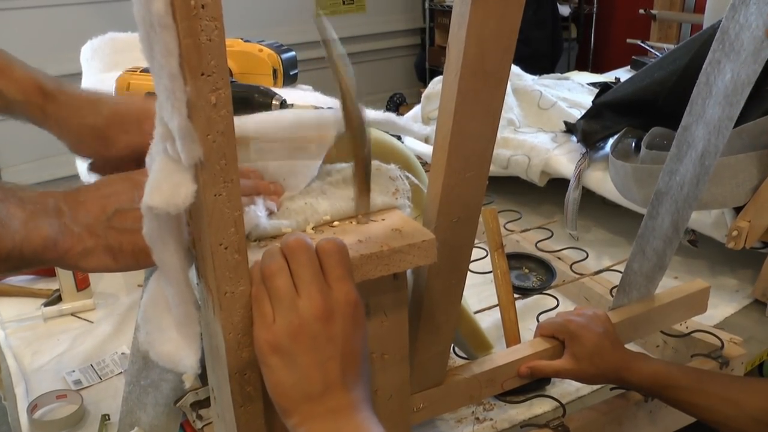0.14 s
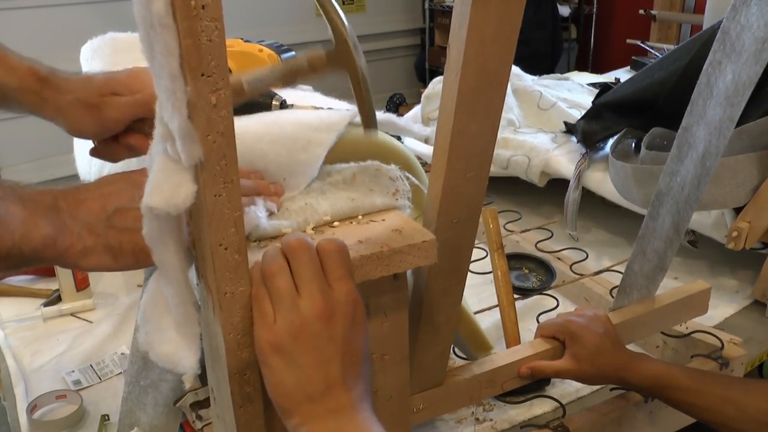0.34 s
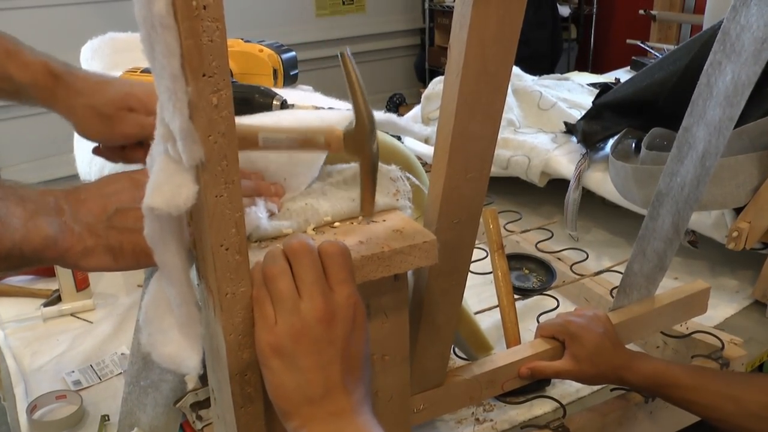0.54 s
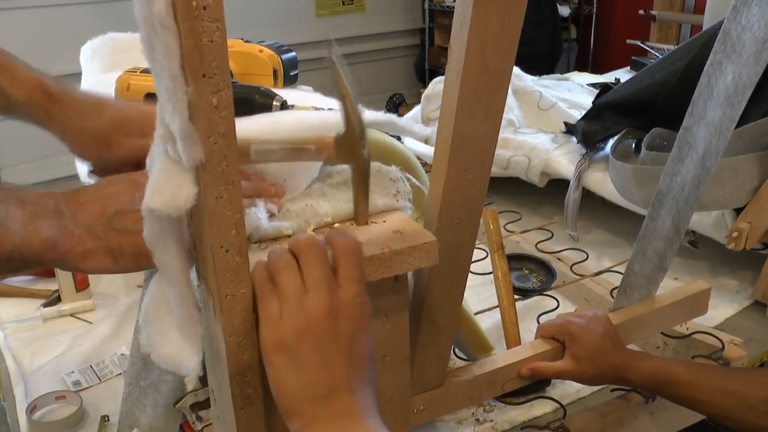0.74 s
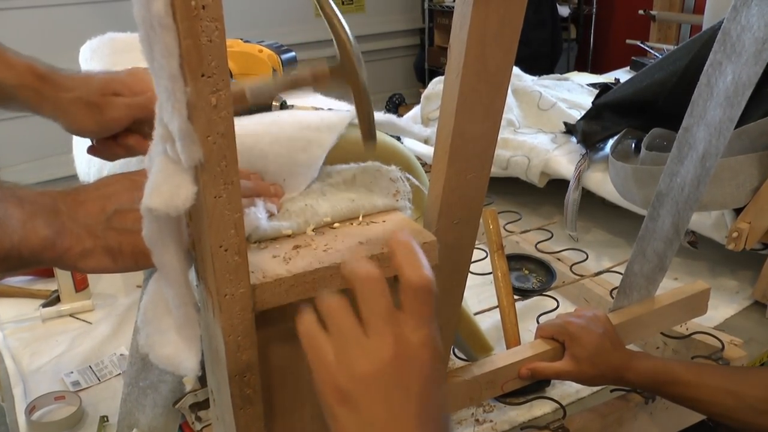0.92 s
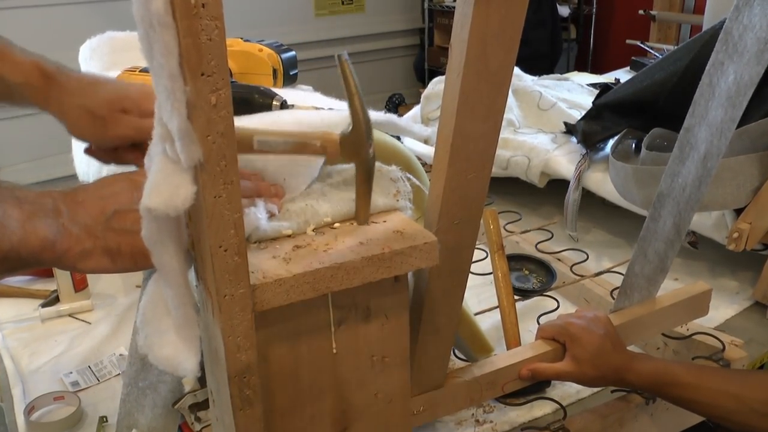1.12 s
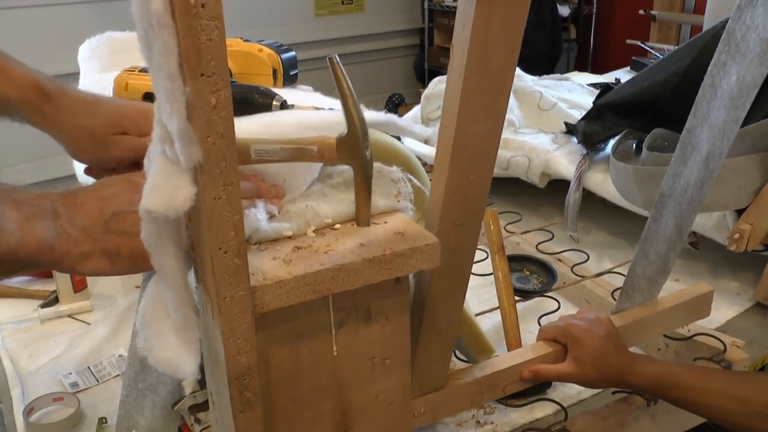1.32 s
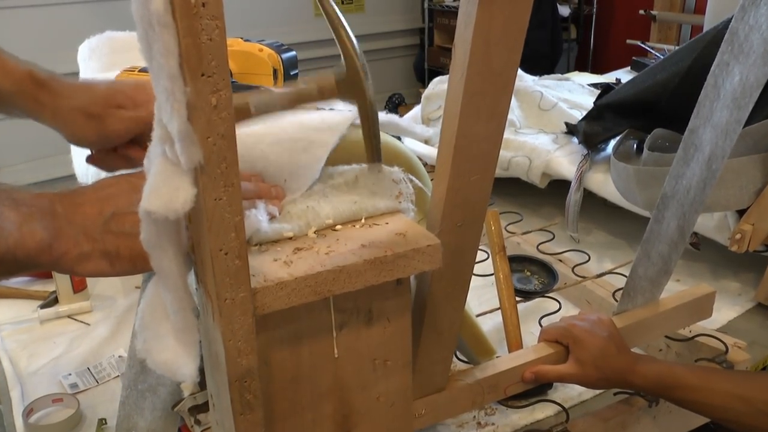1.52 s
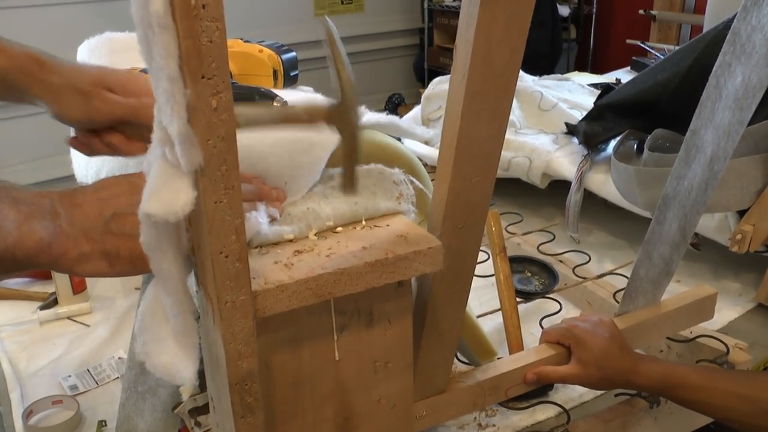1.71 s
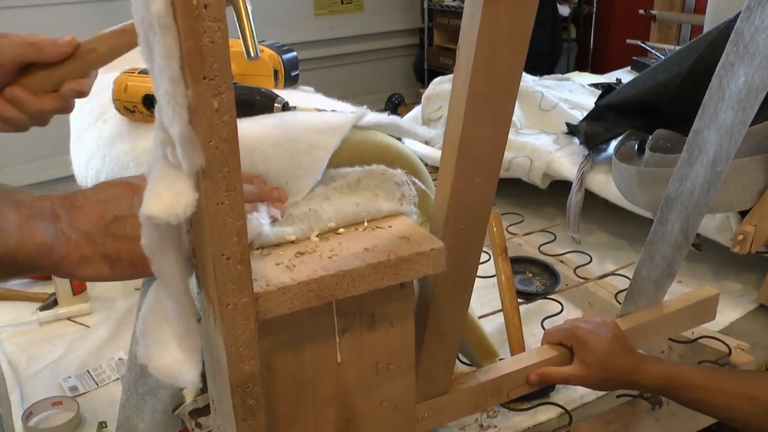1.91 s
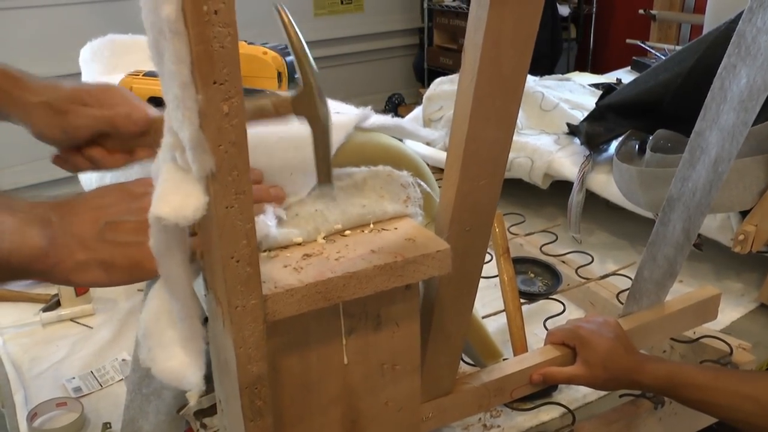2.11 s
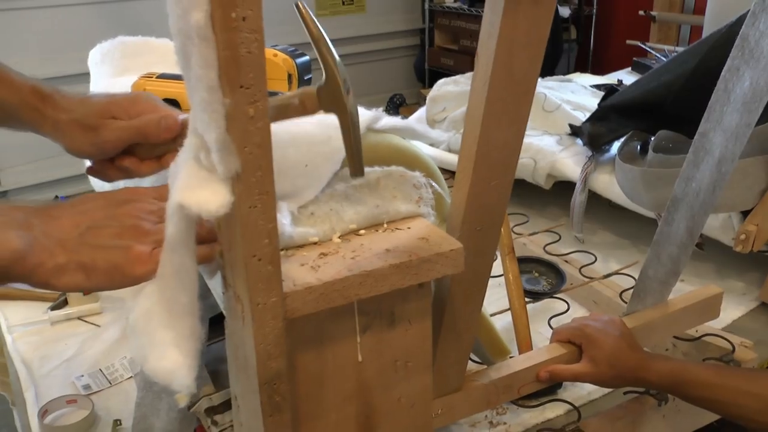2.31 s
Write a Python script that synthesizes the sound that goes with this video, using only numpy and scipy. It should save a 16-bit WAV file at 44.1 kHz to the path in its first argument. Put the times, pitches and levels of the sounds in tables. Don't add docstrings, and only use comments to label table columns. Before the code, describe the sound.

Loud hammering on wood: the tail of an earlier blow with jingling loose metal, then six hard, woody cracks, clipped by a close microphone; afterwards workshop echo fades to low fan hum and a soft rustle.

```python
import sys
import numpy as np
from scipy import signal
from scipy.fft import rfft, irfft
from scipy.io import wavfile

SR = 44100
rng = np.random.default_rng(int(sys.argv[2]) if len(sys.argv) > 2 else 0)


def ratio(d):
    e = np.asarray(d, float) / 20
    return 10 ** e


def file_out(sig):
    cols = np.atleast_2d(sig).T
    lim = np.clip(cols, -1, 1)
    pcm = np.round(lim * 32767).astype(np.int16)
    wavfile.write(sys.argv[1], SR, pcm)


N = 103635
LEAD_S = 0.2
N_LINE = N + int(LEAD_S * SR)


def rms_one(x):
    return x / np.sqrt(np.mean(x ** 2) + 1e-20)


def at_hz(points, hz, column=1):
    points = np.array(points)
    return np.interp(np.log(hz), np.log(points[:, 0]), points[:, column])


def butter(x, order, hz, kind):
    return signal.sosfilt(signal.butter(order, hz, kind, fs=SR, output="sos"), x)


def ring(clicks, hz, t60_s):
    r, w = ratio(-60 / (t60_s * SR)), 2 * np.pi * hz / SR
    return signal.lfilter([0, np.sin(w)], [1, -2 * r * np.cos(w), r * r], clicks + 1e-18)


def bands(size):
    edges_hz = 22 * 2 ** (np.arange(30) / 3)
    white = rng.standard_normal((2, size))
    out = []
    for k, (low, high) in enumerate(zip(edges_hz, edges_hz[1:])):
        out.append((np.sqrt(low * high), butter(white[k % 2], 2, [low, high], "band")))
    return out


def train(s, gains):
    out = np.zeros(N_LINE)
    out[((np.asarray(s) + LEAD_S) * SR).astype(int)] = gains
    return out


# mode in Hz, level in dB, t60 in seconds.
HEAD_MODES = [(1073, -41.5, 1), (5764, -34, 0.1), (13325, -33.5, 0.25)]
CRACK_DB, CRACK_HZ, CRACK_T60_S = 20, 5230, 0.002
SPLINTER_DB, SPLINTER_T60_S = 5, 0.02


def contact(s, db):
    hits = train(s, ratio(db))
    crack = ring(hits, CRACK_HZ, CRACK_T60_S)
    decay = signal.lfilter([1], [1, -ratio(-60 / (SPLINTER_T60_S * SR))], hits)
    splinter = butter(decay * rng.standard_normal(N_LINE), 1, [1500, 7000], "band")
    head = sum(ratio(level_db) * ring(hits, hz, t60_s) for hz, level_db, t60_s in HEAD_MODES)
    return ratio(CRACK_DB) * crack + ratio(SPLINTER_DB) * splinter + head


# mode in Hz, level in dB, t60 in seconds.
FRAME_MODES = [(125, -34, 0.12), (260.7, -10, 0.092), (332.6, -3, 0.079), (375.4, 0.5, 0.072),
               (438.9, -3, 0.081), (493.4, -5, .05), (569.8, 3.5, 0.062), (638.1, 4, 0.069),
               (739, -1.5, 0.055), (865, -6, .04), (1032, -6.5, .035), (1263, -7.5, .035), (1550, -11, .03),
               (1950, -5, 0.027)]
FRAME_DB, MODE_SPREAD_DB, RISE_S, FRAME_LAG_S = 15, 3, 0.00037, 0.0003
PAIR_RATIO, PAIR_DB = 1.055, -4


def frame(s, db):
    spread_db = MODE_SPREAD_DB * rng.normal(0, 1, (len(s), len(FRAME_MODES), 2))
    out = np.zeros(N_LINE)
    for k, (hz, level_db, t60_s) in enumerate(FRAME_MODES):
        sign = (-1) ** ((k + 1) // 3)
        for twin in range(2):
            strike_db = db + level_db + twin * PAIR_DB + spread_db[:, k, twin]
            hits = train(s + FRAME_LAG_S, ratio(strike_db))
            out += sign * ring(hits, hz * PAIR_RATIO ** twin, t60_s)
    r = np.exp(-1 / (RISE_S * SR))
    return ratio(FRAME_DB) * signal.lfilter([1 - r], [1, -r], out)


SNAP_TO_ROOM_DB, SNAP_LOW_HZ = 17.5, 860
SNAP_AIR_DB = -26


def snap(s, db, top_hz):
    edges = train(s, ratio(db + SNAP_AIR_DB))
    for t, level_db, top in zip(s, db, top_hz):
        edges += butter(train([t], ratio(level_db)), 2, top, "low")
    return ratio(SNAP_TO_ROOM_DB) * butter(edges, 1, SNAP_LOW_HZ, "high")


THUD_LOW_HZ, THUD_TOP_HZ, THUD_TO_ROOM_DB = 174, 1204, 22.5


def thud(s, db):
    return ratio(THUD_TO_ROOM_DB) * butter(train(s, ratio(db)), 2, [THUD_LOW_HZ, THUD_TOP_HZ], "band")


ROCK_DELAY_S, ROCK_S, ROCK_HZ, ROCK_DB = 0.15, 0.022, 60, -40


def rocking(s):
    t = np.arange(-3 * ROCK_S, 3 * ROCK_S, 1 / SR)
    bump = ratio(ROCK_DB) * np.exp(-0.5 * (t / ROCK_S) ** 2) * np.sin(2 * np.pi * ROCK_HZ * t)
    return signal.fftconvolve(train(s + ROCK_DELAY_S, 0.96), bump, "same")


# mode in Hz, level in dB, t60 in seconds.
HARDWARE_MODES = [(1064, -4.5, .1), (1135, -9, .03), (1780, 0.5, 0.0077), (2365, -1, 0.047),
                  (3300, -2.5, 0.016), (523, -3, 0.012), (4500, 7, 0.0022), (7300, 2.5, 0.001)]
# time in seconds, level in dB.
RATTLE_VIGOUR = [(-.1, -40.5), (.03, -42.5), (.055, -45), (0.084, -34.5), (.12, -44.5), (.145, -41),
                 (.165, -60), (0.188, -87.5)]
# start in seconds, level in dB.
LONE_TOUCHES = [(0.027, -35), (0.095, -38), (.118, -41), (0.138, -34.5), (1.725, -74), (1.742, -34.5)]
RATTLE_PER_S = 2500


def hardware():
    t = np.arange(N_LINE) / SR - LEAD_S
    vigour = ratio(np.interp(t, *np.transpose(RATTLE_VIGOUR)))
    touch_s, touch_db = np.transpose(LONE_TOUCHES)
    chatter = (rng.random(N_LINE) < RATTLE_PER_S / SR) * vigour + train(touch_s, ratio(touch_db))
    out = np.zeros(N_LINE)
    for hz, level_db, t60_s in HARDWARE_MODES:
        out += ring(chatter * rng.standard_normal(N_LINE) * ratio(level_db), hz, t60_s)
    return out


# centre in Hz, level in dB, t60 in seconds.
ROOM_BANDS = [(61.7, -1, 0.3), (117, 8, .5), (175, -6.5, 0.54), (276, 4, 0.4), (700, -1, 0.5),
              (1387, 12, 0.35), (2260, -1.5, 0.32), (3704, -2, 0.41), (7700, -11, 0.4), (14000, -15.5, .27)]
ROOM_BUILD_S = 0.0021


def workshop(x):
    t = np.arange(SR) / SR
    echo = np.zeros(SR)
    for hz, noise in bands(SR):
        echo += noise * ratio(at_hz(ROOM_BANDS, hz) - 60 * t / at_hz(ROOM_BANDS, hz, column=2))
    echo *= 1 - np.exp(-t / ROOM_BUILD_S)
    return signal.fftconvolve(x, echo / np.sqrt(np.sum(echo ** 2)))[:len(x)]


# frequency in Hz, level in dB per Hz.
CLOTH_SPECTRUM = [(300, -13), (600, 8.5), (1500, -7), (6000, -9), (8000, -24), (14000, -16)]
RUSTLE_AT_S, RUSTLE_S, RUSTLE_DB, RUSTLE_PER_S = 2.19, 0.075, -57.5, 24000


def rustle():
    grains = (rng.random(N) < RUSTLE_PER_S / SR) * rng.standard_normal(N)
    spectrum = rfft(grains * ratio(1.73 * rng.exponential(1, N)))
    hz = np.arange(1, len(spectrum) + 1) * SR / N
    cloth = rms_one(irfft(spectrum * ratio(at_hz(CLOTH_SPECTRUM, hz)), N))
    swell = np.exp(-0.5 * ((np.arange(N) / SR - RUSTLE_AT_S) / RUSTLE_S) ** 2)
    return ratio(RUSTLE_DB) * swell * cloth


HUM_HZ, HUM_WIDTH_HZ, HUM_DB = 226, 10, -51


def fan():
    t60_s = np.log(1000) / (np.pi * HUM_WIDTH_HZ)
    return ratio(HUM_DB) * rms_one(ring(rng.standard_normal(N), HUM_HZ, t60_s))


# frequency in Hz, level in dB per Hz.
AIR_SPECTRUM = [(15, -46.5), (25, -1.5), (415, -8), (529, -15.5), (1060, -17), (1280, -18.5),
                (15000, -45.5)]
AIR_DB = -53.5


def room_air():
    return ratio(AIR_DB) * rms_one(sum(noise * ratio(at_hz(AIR_SPECTRUM, hz)) for hz, noise in bands(N)))


# start in seconds, force in dB, snap in dB, top of the snap in Hz.
BLOWS = [
    (0.2082, -3.5, -0.5, 10000),
    (0.4933, -4, 0.5, 9400),
    (0.7849, -2, 1, 11000),
    (1.0858, -0.5, 2.5, 3580),
    (1.353, -2, 2.5, 9000),
    (1.6092, -2.5, 4.5, 5980),
]
# start in seconds, force in dB, snap in dB, top of the snap in Hz.
EARLIER_BLOW = (-0.0043, -6.5, -1.5, 7996.5)
BRIGHT_HZ, DULL_LOSS_DB = 9000, 10.5
WALL_S, WALL_DB = 0.0178, -25
FAR_WALL_S, FAR_WALL_DB, FAR_WALL_HZ = 0.075, -26.5, 662
WOOD_TO_ROOM_DB, HEAD_TO_ROOM_DB, RATTLE_TO_ROOM_DB = -29, -7, -6.5


def scene():
    s, db, snap_db, top_hz = np.transpose([EARLIER_BLOW, *BLOWS])
    steel = contact(s, DULL_LOSS_DB * np.log2(top_hz / BRIGHT_HZ))
    wood, bits = frame(s, db), hardware()
    wall = ratio(WALL_DB) * np.roll(steel, int(WALL_S * SR))
    far = ratio(FAR_WALL_DB) * np.roll(wood, int(FAR_WALL_S * SR))
    far = signal.lfilter(*signal.iirpeak(FAR_WALL_HZ, 3.0, fs=SR), far)
    sent = ratio(WOOD_TO_ROOM_DB) * wood + thud(s, db) + snap(s, snap_db, top_hz)
    sent += ratio(HEAD_TO_ROOM_DB) * wall + ratio(RATTLE_TO_ROOM_DB) * bits
    work = wood + steel + wall + far + bits + workshop(sent) + rocking(s)
    return (work[-N:] + rustle() + fan() + room_air())[None]


CLIP_TOP, CLIP_HARDNESS = 0.83, 6
COUPLING_HZ, CUTOFF_HZ = 22, 16800


def roll_off(x):
    return signal.sosfilt(signal.butter(12, 16830, fs=SR, output="sos"), x)


def record(dry):
    x = dry / (1 + np.abs(dry / CLIP_TOP) ** CLIP_HARDNESS) ** (1 / CLIP_HARDNESS)
    x = butter(x, 1, COUPLING_HZ, "high")
    x = signal.sosfilt(signal.cheby2(12, 60, CUTOFF_HZ, fs=SR, output="sos"), x)
    return roll_off(x)


dry = scene()
out = record(dry)
file_out(out)
```